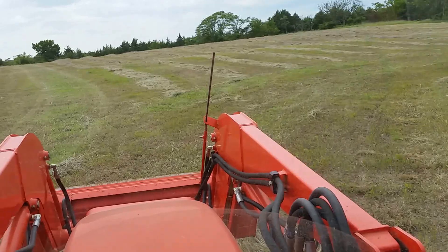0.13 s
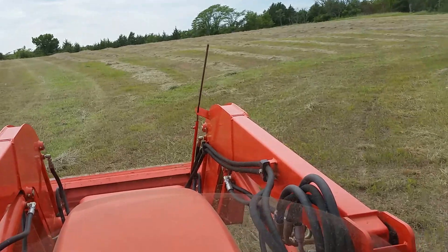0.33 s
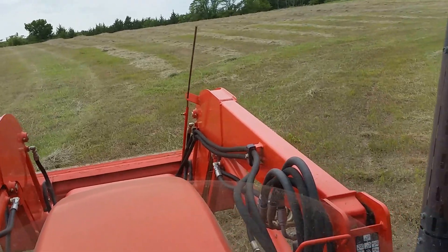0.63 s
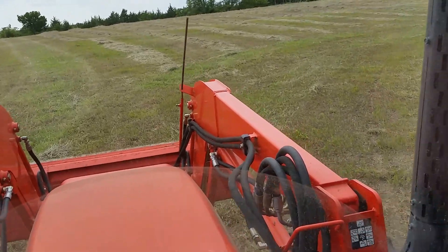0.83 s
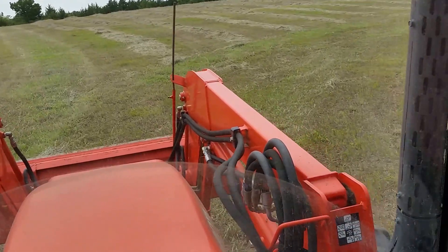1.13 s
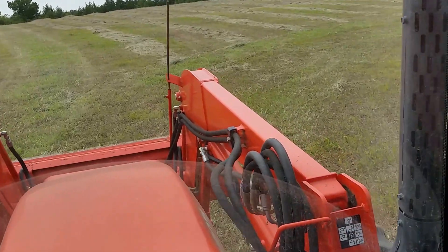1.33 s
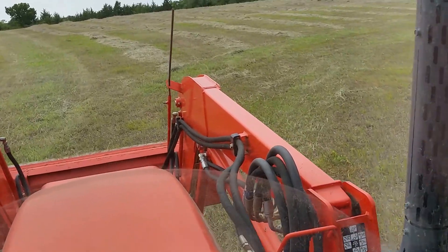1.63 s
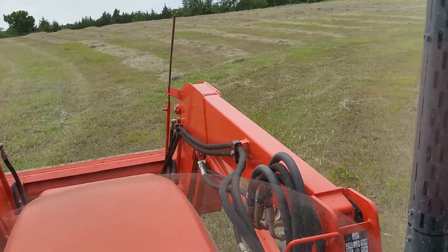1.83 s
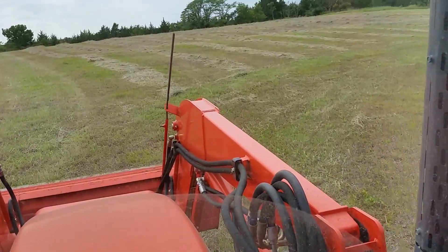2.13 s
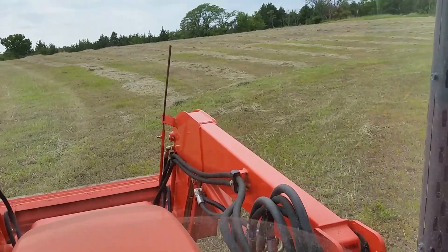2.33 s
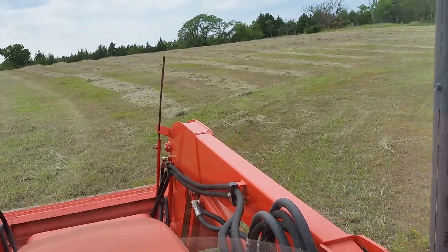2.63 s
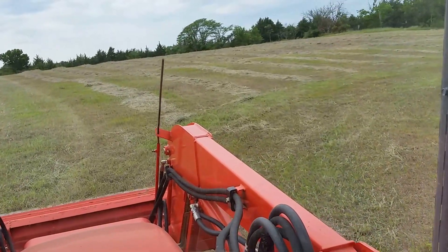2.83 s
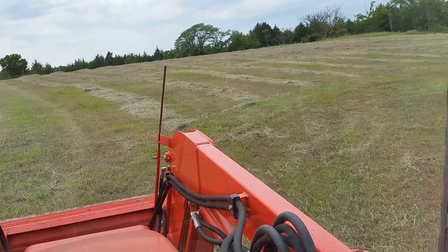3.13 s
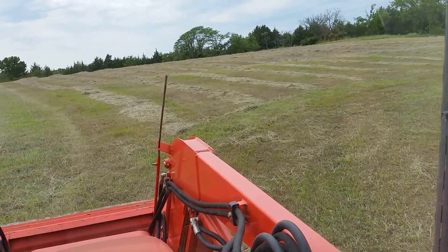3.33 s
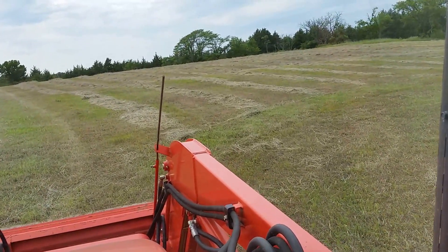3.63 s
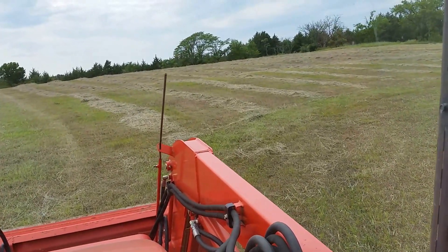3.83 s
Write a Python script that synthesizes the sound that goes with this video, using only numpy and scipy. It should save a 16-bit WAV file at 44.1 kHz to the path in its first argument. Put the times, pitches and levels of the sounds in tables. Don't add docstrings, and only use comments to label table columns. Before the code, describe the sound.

After a short silence, a low tractor drone fades in and holds: humming roof blower, diesel rumble, muffled clatter, thin hydraulic whine and faint air hiss, captured close on a phone inside the cab.

```python
import sys
import numpy as np
from scipy import signal
from scipy.fft import rfft, irfft
from scipy.io import wavfile
from scipy.ndimage import uniform_filter1d, minimum_filter1d, map_coordinates

SR = 44100
rng = np.random.default_rng(int(sys.argv[2]) if len(sys.argv) > 2 else 0)


def wav_out(sig):
    wavfile.write(sys.argv[1], SR, np.round(np.clip(np.atleast_2d(sig).T, -1, 1) * 32767).astype(np.int16))


def convert_level_to_amplitude(level_db):
    exponent = np.asarray(level_db, float) / 20
    return 10 ** exponent


N = 176400

# (level [dB], left over right [dB], left leads [rad])
BLOWER_MULTIPLES = [1, 2, 3, 5]
BLOWER_TONES = [(-21, 0, -.03), (-11.5, -.9, -.08), (-19.7, 1, -.33), (-37, 0, .07)]

# (level [dB], left over right [dB], left leads [rad])
EXHAUST_MULTIPLES = [2, 4, 6]
EXHAUST_TONES = [(-26.5, 0, 0.02), (-28, 2, -0.05), (-36.5, 1, 0.5)]

# (level [dB], left over right [dB], left leads [rad])
FIRING_MULTIPLES = [9, 10.5, 11, 13, 14, 15, 15.5, 16, 16.5, 17, 19, 22.5, 24]
FIRING_TONES = [(-41.5, 3, 0), (-46, 2, 0), (-39, 2, 0.16), (-42, -5, -.1), (-51, -4, .1), (-48.5, -4, 0),
                (-54.5, -1, 0), (-50, 1, 0), (-51.5, 0, -.5), (-43, 1, .4), (-45, 0, -0.29), (-49, -5, -.2),
                (-43, -1, -0.5)]

# (level [dB], left over right [dB], left leads [rad])
GEAR_MULTIPLES = [26, 27, 28, 30, 32, 35, 36, 38]
GEAR_TONES = [(-45.5, -6, 1.6), (-51, -5, .3), (-45.5, -6, 1.7), (-52, -2, -2), (-59, -7, 0), (-61, -4, 0),
              (-54.5, -3, 1.9), (-58, -8, -2.8)]

# (time [s], level [dB], added left over right [dB], added left lead [rad])
PHONE_SWING = [(0, 1, 4, 1.1), (.7, 2, 4, 1.1), (1, 4, -4, .2), (1.25, 5, -5, -1), (1.5, 5.5, -4, -.9),
               (1.75, 3, 0, .3), (2, 2, 1, 1.1), (2.5, 0, 7, .5), (2.9, 2, 12, 1.2), (3.4, 0, 12, 1.8),
               (4, 1, 11, 1.8)]

# (time [s], level [dB])
ENGINE_LOAD = [
    (0, 5.5),
    (1, 0.5),
    (1.7, 1),
    (2.3, 1.5),
    (3, 0),
    (3.5, 2),
    (4, 0.5),
]

# (frequency [Hz], level [dB per Hz])
RUMBLE_COLOR = [(8.8, -50.5), (60, -22), (115, -7.5), (170, -15.5), (200, -18.5), (689, -26), (756, -28.5),
                (878, -34.5), (1300, -37), (1690, -79), (2860, -120)]

# (frequency [Hz], level [dB per Hz])
CLATTER_COLOR = [(530, -24.5), (900, -6), (1040, -11.5), (1350, -13), (1470, -12.5), (2850, -20),
                 (3260, -24.5), (5350, -30), (7500, -42.5), (9750, -66), (16500, -120)]

# (level [dB], left over right [dB], left leads [rad])
PUMP_MULTIPLES = [2, 3, 4, 5, 6, 6.95]
PUMP_TONES = [(-35.5, 0, -1.6), (-48, -3, 1), (-48, -5, 2.5), (-49, -8, -.7), (-49, -7, 3.1), (-51, -3, 2)]

# (time [s], level [dB], added left lead [rad])
OIL_PRESSURE = [(0, 2, 0), (.7, 1, 0), (1, -2, 0), (1.9, -3, -.2), (2.3, -1, -.6), (2.6, 1, -.9),
                (2.95, 1, -1.3), (3.25, 0, -2.2), (3.5, 5.5, -3.3), (3.68, 1, -4.5), (4, 1, -4.8)]

# (frequency [Hz], width [Hz], level [dB])
CAB_RESONANCES = [(28.4, 6.7, -31.5), (98, 67, -28), (127, 12, -25.5), (158, 11.6, -30.5),
                  (175.8, 4.9, -35), (251.7, 26, -32.5), (303.2, 44, -33.5), (678, 42, -39.5),
                  (877, 24, -43.5), (2780, 240, -56.5), (816, 37, -45.5), (420, 43, -40.5)]

# (time [s], level [dB])
FLOOR_DRUMMING = [(0, -39), (.7, -17), (.9, -30), (1.2, -17), (1.6, -33), (1.9, -25), (2.4, -32),
                  (2.8, -13.5), (3.05, -24), (3.25, -25), (3.5, -15.5), (3.75, -17), (4, -18.5)]

# (time [s], level [dB])
GROUND_SHAKE = [(0, 10), (.7, 1), (.9, 1.5), (1.3, 2), (1.6, 0), (2, 1.5), (2.4, -2.5), (2.7, 0.5), (3, -1),
                (3.3, 2.5), (3.75, -0.5), (4, 1)]

# (frequency [Hz], level [dB per Hz])
VENT_COLOR = [(3820, -29), (6500, -6.5), (7440, -8.5), (9070, 0), (10600, -3.5), (11700, -2), (14200, -6),
              (15600, -9.5)]

# (time [s], level [dB])
VENT_FLOW = [
    (0, 1),
    (.95, 2),
    (1.1, -0.5),
    (1.6, 0.5),
    (2, -1),
    (2.3, 0),
    (2.8, 1),
    (2.97, -2),
    (3.15, .5),
    (4, -1),
]

# (time [s], peak level [dB])
JOLTS = [
    (1.3992, -45),
    (1.7035, -49),
    (2.0867, -42),
    (2.169, -43),
    (2.2614, -41.5),
    (2.482, -41),
    (3.056, -40),
    (3.4285, -49),
]

# (time [s], pitch [Hz], level [dB])
TURBO_WHISTLE = [(.4, 2790, -52), (.85, 2814, -47), (1.2, 2780, -57), (1.55, 2780, -46), (1.8, 2820, -47),
                 (2.1, 2806, -49), (2.38, 2595, -65), (2.56, 2710, -44), (2.751, 2840, -62),
                 (3.15, 2890, -47), (3.45, 2890, -46), (3.65, 2770, -71), (3.85, 2800, -63), (4, 2890, -56)]

# (frequency [Hz], left over right [dB])
PORT_DIFFERENCE = [(350, -0.5), (600, -1), (1500, -5), (2400, -2.5), (3300, 7), (6500, 8), (9000, 0),
                   (12000, -6)]

# (frequency [Hz], likeness [-1 to 1])
PORT_LIKENESS = [(30, 0.91), (95, .999), (150, .985), (200, 0.55), (250, 0.95), (400, 0.92), (600, 0.62),
                 (1100, -0.079), (2000, -0.069), (3500, 0), (15000, -0.039)]


def unit(x):
    return x / np.sqrt(np.mean(x ** 2) + 1e-20)


def along(points, hz):
    f, value = np.transpose(points)
    return np.interp(np.log(hz + 1), np.log(f + 1), value)


def curve(rows, column=1):
    return np.interp(np.arange(N) / SR, *np.transpose(rows)[[0, column]])


def wobble(rate, count=1):
    knots = rng.standard_normal((count, int(N * rate / SR) + 4))
    place = np.arange(N) * rate / SR
    return np.array([map_coordinates(k, [place]) for k in knots])


def rush(gain, patchy_db):
    noise = rng.standard_normal((2, N + 2048))
    grains = signal.stft(noise, nperseg=512)[2]
    patches = rng.standard_normal(grains.shape[1:])
    patches = uniform_filter1d(uniform_filter1d(patches, 6, 0), 14, 1)
    patchy = signal.istft(grains * convert_level_to_amplitude(patchy_db * unit(patches)), nperseg=512)[1]
    a, b = rfft(patchy[:, 1024:][:, :N])
    hz = np.fft.rfftfreq(N, 1 / SR)
    turn = np.arccos(np.clip(along(PORT_LIKENESS, hz), -1, 1)) / 2
    mid, side = a * np.cos(turn), b * np.sin(turn)
    ports = convert_level_to_amplitude(along(PORT_DIFFERENCE, hz) / 2 * [[1], [-1]])
    return unit(irfft(gain(hz) * ports * [mid + side, mid - side], N))


def turns(base_hz, drift):
    speed_hz = base_hz * (1 + drift * wobble(2.97)[0])
    return 2 * np.pi * np.cumsum(speed_hz) / SR


def tones(multiples, rows, angle, sway_db, slip, rate, shift=0, swing_db=0, swing_rad=0):
    db, pan_db, lead = np.transpose(rows)[..., None]
    gain = np.sqrt(2) * convert_level_to_amplitude(db + sway_db * wobble(rate, count=len(rows)))
    phase = np.outer(multiples, angle) + shift + slip * wobble(rate, count=len(rows))
    ports = []
    for side in (1, -1):
        loudness = gain * convert_level_to_amplitude(side * (pan_db + swing_db) / 2)
        ports.append((loudness * np.cos(phase + side * (lead + swing_rad) / 2)).sum(0))
    return np.array(ports)


def blower():
    even = np.array(BLOWER_MULTIPLES)[:, None] % 2 == 0
    angle = turns(55.08, drift=0.0004)
    return tones(BLOWER_MULTIPLES, BLOWER_TONES, angle, sway_db=.7, slip=0.1, rate=4,
                 shift=1.15 * even)


def exhaust(angle):
    return tones(EXHAUST_MULTIPLES, EXHAUST_TONES, angle, sway_db=1.2, slip=.3, rate=4)


def firing(angle, load_db):
    return convert_level_to_amplitude(load_db) * tones(FIRING_MULTIPLES, FIRING_TONES, angle, sway_db=2.5, slip=0.7, rate=10)


def gears(angle):
    gear_db, swing_db, swing_rad = (curve(PHONE_SWING, column=k) for k in (1, 2, 3))
    return convert_level_to_amplitude(gear_db) * tones(GEAR_MULTIPLES, GEAR_TONES, angle, sway_db=2.5, slip=0.65, rate=8,
                                swing_db=swing_db, swing_rad=swing_rad)


def panel_rumble():
    level = convert_level_to_amplitude(-23 + 1.4 * wobble(6.74) + 1.37 * wobble(15))
    return level * rush(lambda hz: convert_level_to_amplitude(along(RUMBLE_COLOR, hz)), patchy_db=-1.0)


def clatter():
    level = convert_level_to_amplitude(-32.5 + 0.16 * wobble(6.25) + 0.43 * wobble(25))
    return level * rush(lambda hz: convert_level_to_amplitude(along(CLATTER_COLOR, hz)), patchy_db=0.56)


def engine():
    angle = turns(36.29, drift=0.001202)
    load_db = curve(ENGINE_LOAD)
    beat = 0.06 * np.cos(angle + 1) + 0.035 * np.cos(2 * angle)
    beat += 0.06 * np.cos(3 * angle) + 0.05 * np.cos(4 * angle)
    noise = (1 + beat) * panel_rumble() + (1 + 0.34 * beat) * clatter()
    return exhaust(angle) + firing(angle, load_db) + gears(angle) + convert_level_to_amplitude(0.16 * load_db) * noise


def pump():
    angle = turns(229.8, drift=0.001373)
    sing = tones(PUMP_MULTIPLES, PUMP_TONES, angle, sway_db=2.5, slip=0.68, rate=9,
                 swing_rad=curve(OIL_PRESSURE, column=2))
    return convert_level_to_amplitude(curve(OIL_PRESSURE)) * sing


def resonance(hz, center_hz, width_hz):
    return (hz * width_hz / np.abs(center_hz ** 2 - hz * hz + 1j * hz * width_hz)) ** 2


def floor_drum():
    drum = rush(lambda hz: resonance(hz, center_hz=144.5, width_hz=9), patchy_db=0.5)
    return convert_level_to_amplitude(curve(FLOOR_DRUMMING)) * drum


def cab_boom():
    def color(hz):
        return np.sqrt(sum(convert_level_to_amplitude(2 * db) / width * resonance(hz, center, width) ** 2
                           for center, width, db in CAB_RESONANCES))

    total = np.sqrt(sum(convert_level_to_amplitude(2 * db) for center, width, db in CAB_RESONANCES))
    shake = convert_level_to_amplitude(curve(GROUND_SHAKE) + 0.96 * wobble(13.0))
    return total * shake * rush(color, patchy_db=0.2)


def vent():
    rise_s, fall_s = .006, 0.022
    t = np.arange(N) / SR
    puffs = np.zeros(N)
    for start, db in JOLTS:
        age = np.abs(t - start)
        puffs += convert_level_to_amplitude(db - 0.5) * (t > start) * (1 - np.exp(-age / rise_s)) * np.exp(-age / fall_s)
    flow = convert_level_to_amplitude(-49.5 + curve(VENT_FLOW) + 0.44 * wobble(3.24) + .8 * wobble(12))
    return np.hypot(flow, puffs) * rush(lambda hz: convert_level_to_amplitude(along(VENT_COLOR, hz)), patchy_db=0.8)


def turbo():
    pitch_hz = curve(TURBO_WHISTLE) + 25 * wobble(8.9)[0]
    angle = 2 * np.pi * np.cumsum(pitch_hz) / SR
    fuzz = 3.0 * wobble(60) + .5 * wobble(40, count=2)
    level_db = curve(TURBO_WHISTLE, column=2) + 2.5 * wobble(25) + [[0], [-4]]
    return convert_level_to_amplitude(level_db) * np.sqrt(2) * np.cos(angle + fuzz + [[0], [2.2]])


def scene():
    return blower() + engine() + pump() + floor_drum() + cab_boom() + vent() + turbo()


def low_pass(x):
    return signal.sosfilt(signal.butter(12, 15730, fs=SR, output="sos"), x)


def record(dry):
    fade_start_s, fade_s, step_s = .36, .29, .01
    need = np.minimum(1, 0.94 / (np.abs(dry).max(0) + 1e-9))
    gain = uniform_filter1d(minimum_filter1d(need, size=441), size=441)
    since = np.arange(N) / SR - fade_start_s
    fade = np.clip(np.floor(since / step_s) * step_s / fade_s, 0, 1)
    rounded = uniform_filter1d(fade, size=200, origin=99)
    fade = np.where(since < .025, rounded, fade)
    ending = np.clip((since[-1] - since) / .002, 0, 1)
    return low_pass(fade * ending * gain * dry)


dry = scene()
out = record(dry)
wav_out(out)
```